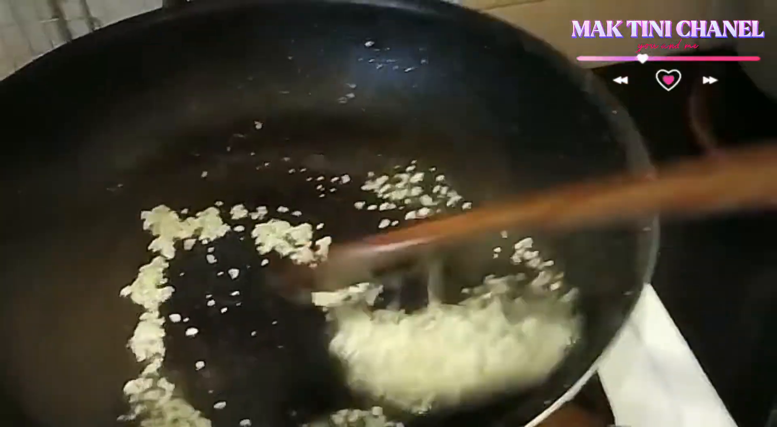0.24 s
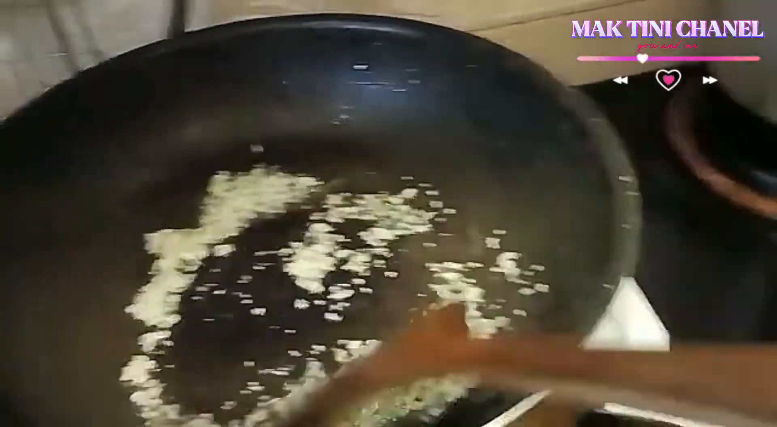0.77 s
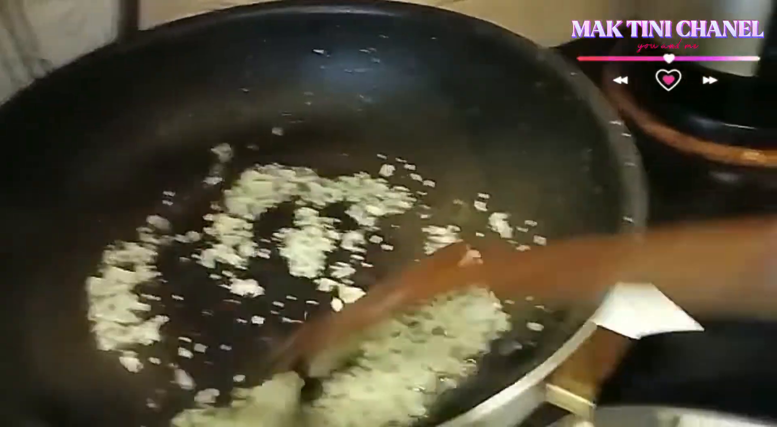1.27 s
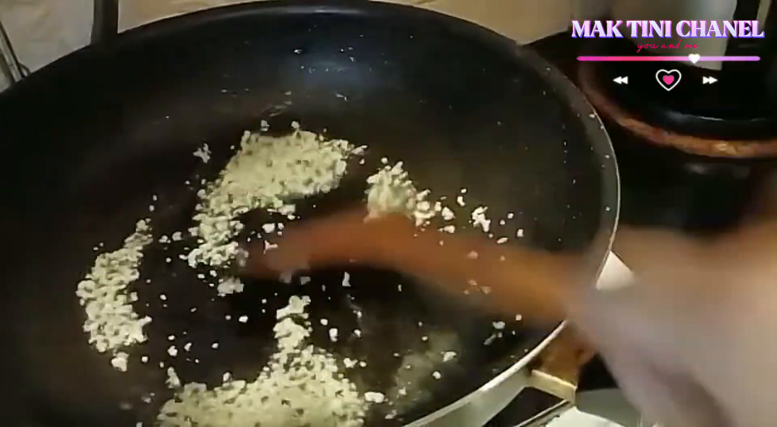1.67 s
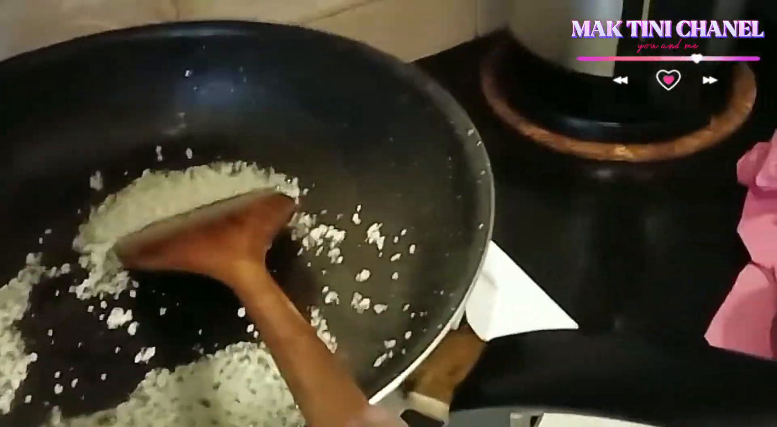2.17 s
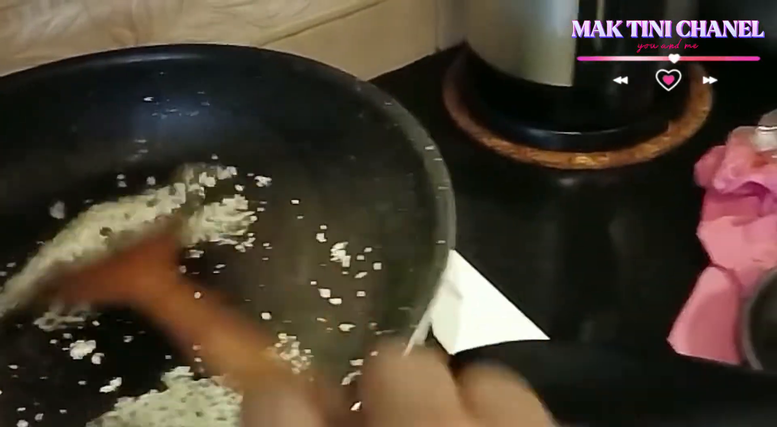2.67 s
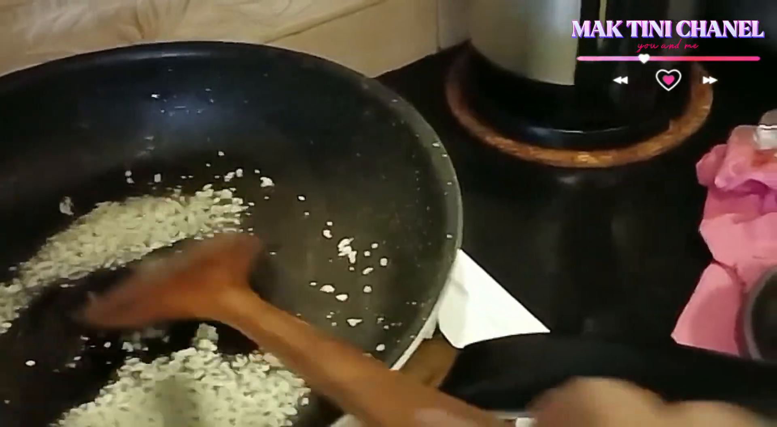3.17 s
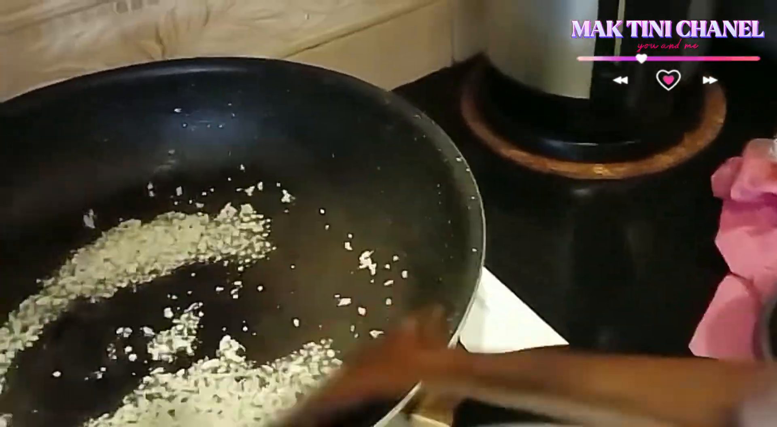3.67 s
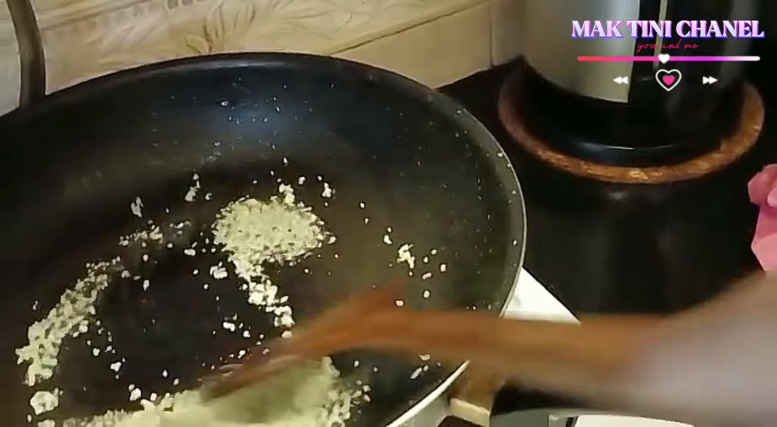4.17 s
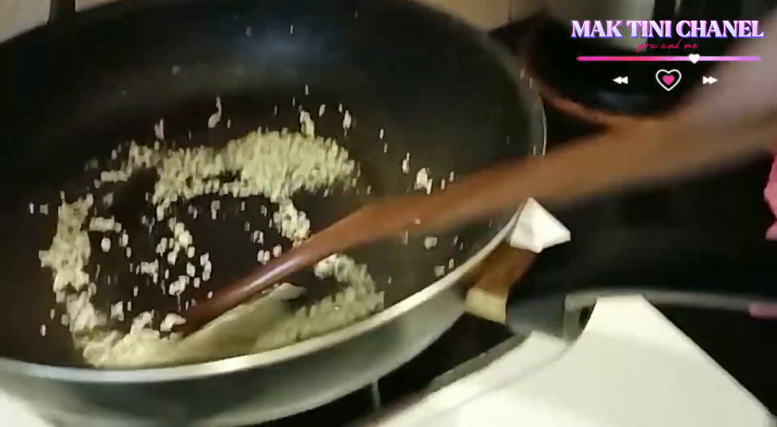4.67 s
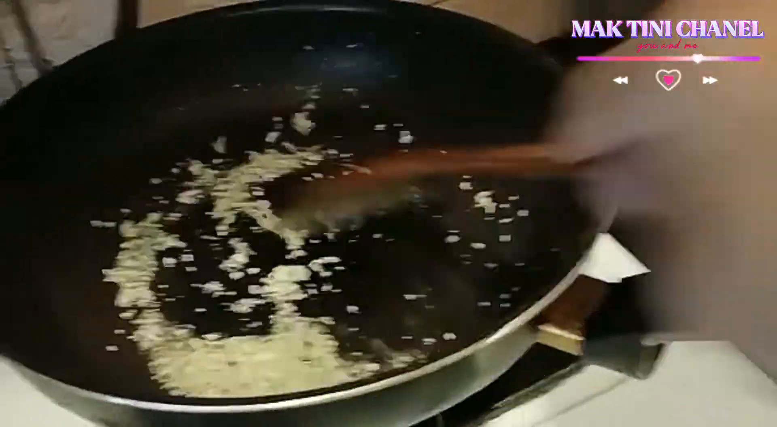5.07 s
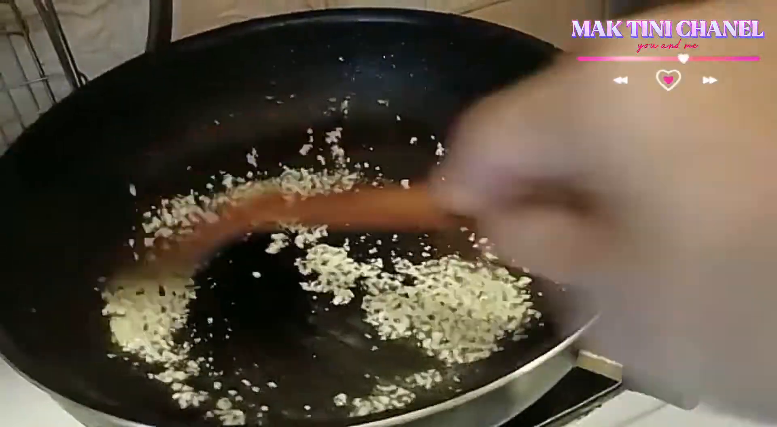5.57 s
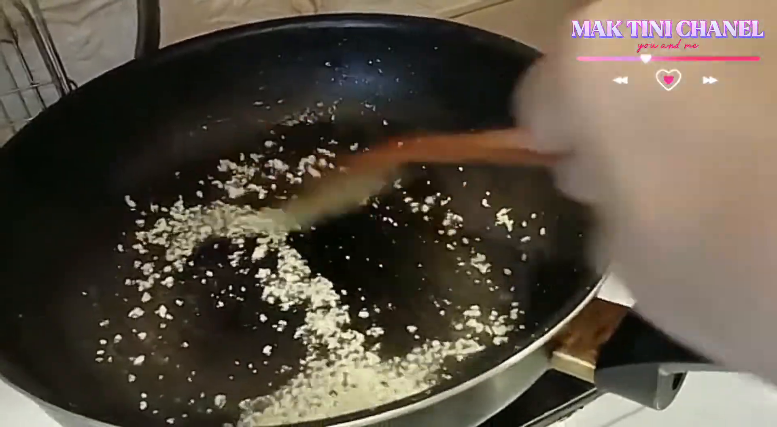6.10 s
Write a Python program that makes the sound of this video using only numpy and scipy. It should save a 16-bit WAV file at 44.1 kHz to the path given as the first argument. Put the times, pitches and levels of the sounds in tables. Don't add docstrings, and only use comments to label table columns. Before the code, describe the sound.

Close up in a small kitchen, a wooden spatula stirs garlic in a coated wok. It opens with a dull scuff and scrape, then sharp woody knocks with short metallic ring. Scrapes and quieter gaps alternate, with the hardest blows near the middle. Beneath runs a faint sizzle that gradually softens, plus a low, lumpy gas flame. Phone stereo microphone, slightly heavier on the left, with short room echo.

```python
import sys
import numpy as np
from scipy import signal
from scipy.fft import rfft, irfft, next_fast_len
from scipy.io import wavfile

SR = 44100
rng = np.random.default_rng(int(sys.argv[2]) if len(sys.argv) > 2 else 0)


def materialize(psi):
    bounded = np.clip(np.atleast_2d(psi).T, -1, 1)
    quanta = np.round(bounded * 32767).astype(np.int16)
    wavfile.write(sys.argv[1], SR, quanta)


def field_ratio(decibels):
    return 10 ** (np.asarray(decibels, dtype=float) / 20)


N = 279594
STEP = 32

# (time [s], level [dB])
FRY = [
    (0.0, -52),
    (0.44, -51),
    (1.48, -54),
    (1.84, -53),
    (2.47, -57),
    (3.0, -56),
    (3.36, -59),
    (5.03, -60),
    (5.67, -58),
    (6.34, -60),
]
# (time [s], level [dB])
ROAR = [
    (0.0, -52),
    (0.56, -53.5),
    (1.0, -53.5),
    (2.7, -52),
    (3.0, -53.5),
    (3.2, -53),
    (4.11, -52.5),
    (6.34, -51.5),
]
# (time [s], peak level [dB])
FLAPS = [(0.0, -45), (0.21, -48), (0.55, -50), (0.94, -53), (1.52, -51.5), (2.67, -54), (3.58, -56),
         (3.87, -56), (4.12, -53), (4.6, -55), (4.97, -45.5), (5.42, -54.5), (5.74, -52.5), (6.3, -55.5)]
FLAP_FADE_DB_PER_S, RUMBLE_REST_DB = 173, -64
# (frequency [Hz], level per Hz [dB])
SIZZLE = [(1180, -48), (2000, -4), (2320, 8.5), (2680, -41), (3090, -1), (4200, 1.5), (9070, 5.5),
          (11000, 5), (16000, -0.5)]
FLAME = [(76, -47), (130, -31), (174, -17.5), (226, -18.5), (360, 0.5), (537, -14.5), (738, -4),
         (1210, -10.5), (1570, -3.5), (2350, -25.5), (2890, -12), (3500, -23.5), (4550, -47), (7700, -120)]
RUMBLE = [(15, -67), (25, -37), (38, -58), (75, 24.5), (119, -27), (177, 2.5), (200, -32), (260, -49),
          (440, -120)]

# (time [s], peak level [dB], centre of colour [Hz], bowl hum [dB], rim [dB])
KNOCKS = [(0.471, -17, 1750, -49, -36), (0.712, -19.5, 1750, -47, -29.5), (1.223, -16.5, 1530, -36, -50),
          (1.479, -15.5, 1730, -48, -27.5), (2.627, -8.5, 1130, -39, -29), (2.633, -11, 1320, -65, -60),
          (3.341, -25.5, 1950, -53.5, -54), (3.785, -8.5, 1770, -38, -29.5),
          (3.849, -14.5, 1530, -38.5, -34), (4.605, -31, 1600, -45, -42), (4.882, -20, 1640, -45, -36),
          (4.887, -34, 1510, -44.5, -38), (4.897, -19.5, 1580, -63, -36)]
# (time [s], peak level [dB], centre of colour [Hz], bowl hum [dB], rim [dB])
SCUFFS = [(0.097, -13.5, 1180, -57, -73), (0.194, -23, 1600, -44.5, -48), (0.935, -22, 1150, -79, -61),
          (0.965, -17, 1000, -74, -48), (0.993, -19, 1060, -80, -64), (1.009, -30, 970, -75, -51),
          (1.167, -15, 1150, -46, -68), (1.532, -18, 1100, -46, -67), (1.549, -36, 1120, -54, -49),
          (1.733, -40, 1770, -55, -55), (2.098, -28, 1060, -48.5, -62), (2.802, -29, 1570, -63, -44),
          (3.121, -29, 1620, -70, -45), (4.111, -44, 2200, -62, -49.5), (5.129, -46, 1420, -46, -73),
          (5.621, -22, 1060, -64, -73), (5.672, -30, 1600, -50, -67)]
# (time [s], peak level [dB])
THUDS = [(0.095, -20.5), (0.712, -46), (1.167, -20), (1.224, -31), (1.735, -47), (2.628, -29.5),
         (3.785, -60), (4.067, -58), (4.605, -26.5), (5.625, -35), (5.678, -34)]
KNOCK_CONTACT_S, SCUFF_CONTACT_S, THUD_CONTACT_S = 0.0067, 0.013, 0.008
TOUCH_RISE_S, TOUCH_LEAD_S = 0.0016, 0.002287
# (frequency [Hz], level when struck [dB], time to fall 60 dB [s], level when scraped [dB])
BOWL = [(127.8, -6.5, 0.15, -31), (158.2, 1.5, 0.11, -8), (221.3, 4.5, 0.056, -11), (249.7, -2.5, 0.075, 2),
        (317.4, -5.5, 0.041, 0.5)]
LOWER = [(516.9, -7, 0.099, 2.5), (563.6, 6.5, 0.022, 3.5), (634, 13, 0.031, 4), (739, 1.5, 0.018, -1.5)]
WALL = [(901, -7, 0.073, 3), (960, -37, 0.02, -23), (1060, -5, 0.077, 5.5), (1150, 5, 0.021, -52),
        (1251, -1, 0.059, -0.5), (1380, -1.5, 0.03, -4.5), (1530, 1.5, 0.029, 1.5),
        (1600, -4.5, 0.073, 6.5), (1637, -1.5, 0.055, 3.5), (1970, -2, 0.039, 6), (2090, -17, 0.058, 0.5),
        (2226, 3.5, 0.046, -5)]
RIM = [(2450, 5.5, 0.026, 8), (2676, -0.5, 0.023, 2), (2890, -5, 0.027, -6), (3220, -2.5, 0.029, -4),
       (3443, 3, 0.024, 8), (3590, -9, 0.03, -11), (3840, -33, 0.016, -33), (4230, -6, 0.021, 5),
       (4652, -6.5, 0.022, -15), (4640, -8, 0.017, 2), (5203, -5, 0.0099, 1.5), (5720, -6, 0.036, 1),
       (6320, -6, 0.011, 1)]

# (time of hardest press [s], length [s], wall level [dB], centre of colour [Hz], rim level [dB])
WALL_DRAGS = [(0.11, 0.099, -34, 1180, -76), (0.194, 0.13, -37, 1380, -51), (0.46, 0.038, -40, 1900, -56),
              (0.701, 0.022, -40, 1900, -46), (0.997, 0.075, -28, 1060, -45),
              (1.16, 0.041, -32.5, 1200, -68), (1.295, 0.5, -63, 1530, -48),
              (1.31, 0.066, -38.5, 1220, -55), (1.545, 0.072, -35, 1150, -56),
              (1.728, 0.024, -35, 1770, -64), (1.968, 0.14, -43.5, 1460, -50),
              (2.086, 0.073, -46.5, 1330, -54), (2.826, 0.1, -35, 1710, -47),
              (2.896, 0.078, -41.5, 1050, -47), (2.943, 0.082, -44, 1060, -66),
              (3.021, 0.12, -39.5, 1430, -60), (3.125, 0.13, -40, 1480, -47.5),
              (3.273, 0.11, -40.5, 980, -57), (3.344, 0.055, -42, 1770, -47),
              (3.771, 0.029, -45, 1530, -47), (4.078, 0.053, -44, 1000, -72),
              (4.675, 0.11, -47.5, 1600, -48), (4.877, 0.014, -28, 1660, -34.5),
              (4.885, 0.031, -46, 1600, -37), (5.688, 0.21, -42.5, 1360, -54)]
# (time of hardest press [s], length [s], lower wall level [dB], bowl hum [dB])
BOTTOM_DRAGS = [(0.112, 0.068, -30, -43), (0.19, 0.18, -36, -36.5), (0.495, 0.09, -52, -41),
                (0.715, 0.067, -45, -41.5), (0.995, 0.15, -43.5, -83), (1.164, 0.11, -37.5, -45.5),
                (1.228, 0.17, -41.5, -45), (1.493, 0.056, -68, -46), (1.532, 0.05, -39.5, -52),
                (1.723, 0.069, -43.5, -48.5), (1.967, 0.2, -52, -68), (2.07, 0.17, -55.5, -50.5),
                (2.662, 0.22, -54, -47), (2.807, 0.038, -50, -52.5), (3.04, 0.2, -46, -49),
                (3.351, 0.027, -42, -67), (3.858, 0.031, -48, -49), (4.074, 0.083, -46, -47.5),
                (4.627, 0.074, -39, -41.5), (4.927, 0.14, -49.5, -56), (5.632, 0.07, -33, -42),
                (5.697, 0.11, -42, -58)]
PRESS_SHARE, PRESS_EDGE_DB, PRESS_SHAPE = 0.45, 23.5, 1.74
GLIDE_OCT_PER_S = -0.6
RUB_WANDER_DB = 3
SKID_WALL_DB, SKID_BOWL_DB, SKID_RIM_DB = -23.5, -4.5, -8
SKID_AFTER_S, SKID_FADE_DB_PER_S = 0.007, 597
CRACK_DB, CRACK_DECAY_S, RASP_DB = -10, 0.0098, -11.5
GRIT_LOW_HZ, GRIT_HIGH_HZ, GRIT_PER_S, GRIT_SPREAD_DB = 2000, 6500, 6000, 3.5
GRIT_LEFT_DB = 1.5

# (time [s], frequency [Hz], level [dB], time to fall 60 dB [s], left over right [dB])
NOTES = [(0.097, 1060, -32, 0.018, 21), (0.471, 1573, -18, 0.021, 5), (0.466, 1643, -26, 0.028, 6),
         (0.713, 1553, -23, 0.016, 15.5), (0.713, 2125, -20.5, 0.011, 7), (0.714, 1097, -30, 0.05, 7),
         (0.714, 3402, -34.5, 0.018, 17), (0.715, 5340, -43.5, 0.033, -3.0), (1.224, 1645, -30, 0.051, 9),
         (1.479, 1904, -14, 0.0091, 1), (1.479, 1102, -35.5, 0.088, 18), (1.479, 4500, -35, 0.06, 5),
         (1.479, 5500, -37, 0.037, -5), (2.627, 5690, -38, 0.022, 5), (1.555, 2710, -51.5, 0.036, 21.5),
         (2.627, 1275, -22.5, 0.02, 18.5), (2.628, 1590, -36, 0.05, 12), (2.632, 1060, -36, 0.046, 26),
         (2.627, 3110, -28, 0.017, 6), (2.628, 3930, -34.5, 0.018, -12.6), (3.341, 1865, -41, 0.034, 8),
         (3.785, 1856, -17.5, 0.027, 1), (3.786, 1262, -20.5, 0.029, 7), (3.787, 3480, -33, 0.02, 7),
         (3.787, 5430, -38.5, 0.027, 7), (3.786, 1096, -26.5, 0.042, 12), (3.8, 2100, -31, 0.03, 2.7),
         (3.822, 1870, -41, 0.024, 12.6), (3.849, 1486, -21, 0.02, 6), (3.849, 2010, -26.5, 0.028, -1),
         (3.85, 3540, -28.5, 0.017, 4.5), (4.604, 1608, -31, 0.044, 22), (0.475, 2130, -31.5, 0.032, 7),
         (4.882, 1560, -23, 0.045, -1), (4.888, 1547, -31, 0.037, -12.7), (4.895, 1800, -17.5, 0.022, 3),
         (4.888, 3680, -37.5, 0.055, 16), (4.895, 5300, -33, 0.017, 5.4), (4.905, 1513, -31, 0.025, 6.5)]
# (time [s], frequency [Hz], level [dB], time to fall 60 dB
# [s], left over right [dB])
MORE_NOTES = [
    (0.085, 700, -35, 0.067, 6),
    (1.513, 166, -31.5, 0.038, 2.5),
    (1.479, 1750, -15.5, 0.0085, 2.6),
    (2.627, 1080, -17.5, 0.016, 13.4),
    (0.24, 1400, -44, 0.022, 8.5),
    (3.792, 1900, -28, 0.018, 5),
    (2.803, 3400, -36.5, 0.047, 14),
]
NOTE_RISE_S, NOTE_DB = 0.0022, 2
# (time [s], peak level [dB])
HUMS = [
    (0.122, -39.5),
    (1.177, -35),
    (3.799, -40.5),
    (4.09, -47),
    (4.902, -35),
    (5.667, -37.5),
]
HUM_HZ, HUM_T60_S = 167.5, 0.4
# (time of middle [s], length [s], frequency [Hz], level [dB], left over right [dB])
SINGS = [(0.206, 0.082, 1610, -51, 17), (0.933, 0.027, 1300, -45, 20), (0.974, 0.039, 1034, -44, 30),
         (1.005, 0.051, 1020, -36, 28), (1.988, 0.045, 1610, -49, 8), (1.01, 0.08, 1606, -47, 8),
         (1.298, 0.082, 1568, -50, 22), (1.54, 0.052, 1095, -33, 23.5), (1.562, 0.038, 1635, -43.5, 6),
         (4.49, 0.045, 345, -49, 4), (1.731, 0.042, 1633, -45, 7), (2.828, 0.05, 3402, -45.5, 12),
         (2.895, 0.054, 3440, -59, 21.4), (2.83, 0.042, 2220, -43.8, 8), (2.85, 0.11, 2510, -55, 21),
         (2.93, 0.031, 2350, -54, 25), (2.83, 0.17, 1530, -55, 11.1), (2.837, 0.031, 890, -49.5, 27),
         (2.882, 0.09, 1068, -48, 16), (2.951, 0.076, 1064, -49, 23), (3.038, 0.07, 1096, -46, 8),
         (3.054, 0.072, 1628, -46.5, 15), (3.108, 0.061, 1080, -55, 30), (3.13, 0.04, 1608, -38, 15),
         (3.135, 0.032, 2560, -44.5, 14), (3.135, 0.043, 4720, -55, 13), (4.64, 0.03, 1600, -59, 15),
         (4.681, 0.064, 1637, -54, 25), (4.66, 0.046, 3330, -53, 3), (4.705, 0.056, 3330, -56.5, 4.5),
         (4.658, 0.037, 4500, -59.5, 20), (0.455, 0.03, 1650, -43, 7), (4.702, 0.039, 1057, -61, 34.5),
         (0.49, 0.022, 1638, -32, 3), (4.876, 0.021, 1790, -43, 14), (4.93, 0.081, 1513, -48, 6.8),
         (4.936, 0.13, 1048, -58, 23), (5.7, 0.074, 1623, -45, 12)]
# (time of middle [s], length [s], frequency [Hz], level [dB], left over right
# [dB])
MORE_SINGS = [
    (1.03, 0.063, 520, -44, 6.2),
    (0.29, 0.047, 250, -42, 4.4),
    (4.678, .08, 5350, -57, 5),
    (4.7, 0.05, 2120, -53, 6),
    (5.745, 0.046, 1080, -49.5, 8.2),
    (5.82, 0.056, 1930, -56.5, 9.8),
    (.93, 0.056, 1070, -43.5, 13),
    (4.078, 0.051, 646, -40, 5.5),
]
SING_DB, SING_WIDTH_HZ, SING_ROUGH, SING_RISE_SHARE = 0.5, 50, 1.1, 0.97
# (time [s], decay [s], centre frequency [Hz], level [dB])
GRINDS = [(0.713, .012, 2000, -34), (1.479, 0.017, 2390, -33), (3.338, 0.02, 2900, -48),
          (1.93, 0.037, 1600, -50), (1.98, 0.032, 1280, -41.5), (2.085, .025, 1400, -44),
          (2.628, 0.014, 2200, -32), (2.803, 0.075, 2500, -38), (2.995, 0.025, 2000, -43.5),
          (3.121, 0.023, 2200, -47), (3.786, 0.016, 2000, -30), (3.85, 0.018, 2200, -42),
          (4.066, 0.023, 900, -59), (4.606, 0.031, 600, -48), (4.875, 0.032, 4960, -43),
          (4.89, 0.038, 2200, -42), (5.618, 0.039, 795, -40.5), (5.68, 0.081, 3820, -52.5)]
GRIND_RISE_S, GRIND_OCTAVES, GRIND_LEFT_DB = 0.002, 0.5, 4.5
# (time [s], peak level [dB])
SPITS = [
    (1.235, -40),
    (2.6255, -65),
    (2.8, -38),
    (3.738, -34),
    (3.7894, -63),
    (3.8554, -58),
    (4.1206, -42.5),
    (4.6044, -46.5),
    (4.895, -54),
]

# (frequency [Hz], likeness [0 to 1])
LIKENESS = [(60, 0.9), (200, 0.052), (500, 0.039), (1500, 0.017), (4000, 0.0098)]
# (frequency [Hz], level [dB])
LEFT_OVER_RIGHT = [(60, 4.5), (250, 3.5), (600, 4.5), (1100, 7.5), (1700, 4), (2500, 2), (5000, 1.5),
                   (9000, -.3), (14000, -.8)]
LEFT_LAG_S = 0.00095
# (frequency [Hz], level [dB])
MICROPHONE = [(20, -6), (60, -12.5), (100, -2.5), (10500, 0.5), (12100, -7.5), (12400, -11), (13900, -14),
              (14400, -2.5), (15500, 1)]
TOP_HZ = 15820
KITCHEN_T60_S, KITCHEN_DB, WALL_CUT_HZ = 0.15, -14, 9000


def rms_one(x):
    return x / np.sqrt(np.mean(x ** 2) + 1e-20)


def in_time(rows):
    s, *columns = np.transpose(rows)
    t = np.arange(N // STEP + 2) * STEP / SR
    return [np.interp(t, s, column) for column in columns]


def since(s):
    return np.arange(N // STEP + 2) * STEP / SR - np.asarray(s)[:, None]


def per_sample(control):
    return np.interp(np.arange(N) / STEP, np.arange(len(control)), control)


def at_hz(points, hz):
    point_hz, value = np.transpose(points)
    return np.interp(np.log(hz), np.log(point_hz), value)


def db_sum(rows_db):
    return 10 * np.log10(np.sum(field_ratio(2 * rows_db), axis=0) + 1e-10)


def drift(rate):
    r = np.exp(-2 * np.pi * STEP * rate / SR)
    noise = rng.standard_normal(N // STEP + 2002)
    return rms_one(signal.lfilter([1], [1, -2 * r, r * r], noise)[2000:])


def later(x, s):
    return np.roll(x, max(round(s * SR), 0))


def grains(per_s, spread_db):
    sizes = field_ratio(spread_db * np.minimum(rng.exponential(1, N), 5)) * rng.choice([-1, 1], N)
    return rms_one(sizes * (rng.random(N) < per_s / SR))


def ring(force, hz, t60, rise_cycles):
    w = 2 * np.pi * hz / SR
    r = field_ratio(-60 / (t60 * SR))
    q = np.exp(-hz / (rise_cycles * SR))
    decay = [0, np.sin(w), 0, 1, -2 * r * np.cos(w), r * r]
    rise = [1 - q, 0, q - 1, 1, -2 * q * np.cos(w), q * q]
    return signal.sosfilt([decay, rise], force + 1e-18)


def lay(rows_s, waves, db, pan_db):
    out = np.zeros((2, N + waves.shape[1]))
    for s, wave, left, right in zip(rows_s, waves, field_ratio(db + pan_db / 2), field_ratio(db - pan_db / 2)):
        at = round(s * SR)
        out[:, at:at + len(wave)] += [left * wave.imag, right * wave.real]
    return out[:, :N]


def banded(source, spectrum, patchy_db, flicker_rate):
    out, together = 0, drift(0.97)
    edges = 2 ** np.arange(np.log2(spectrum[0][0]), np.log2(spectrum[-1][0]) + 1 / 3, 1 / 3)
    for k, (low, high) in enumerate(zip(edges, edges[1:])):
        band = signal.butter(2, [low, min(high, 0.45 * SR)], "band", fs=SR, output="sos")
        mid, side = signal.sosfilt(band, source[k % 2])
        hz = np.sqrt(low * high)
        alike = np.clip(at_hz(LIKENESS, hz), 0, 1)
        flicker_db = patchy_db * (0.03 * together + drift(flicker_rate))
        gain = per_sample(field_ratio(at_hz(spectrum, hz) + flicker_db))
        pair = np.sqrt(1 + alike) * mid + np.sqrt(1 - alike) * side * [[1], [-1]]
        out = out + gain * pair * field_ratio(at_hz(LEFT_OVER_RIGHT, hz) / 2 * np.array([[1], [-1]]))
    out[0] = later(out[0], LEFT_LAG_S)
    return rms_one(out)


def flaps_db():
    s, db = np.transpose(FLAPS)
    swell_db = db[:, None] - FLAP_FADE_DB_PER_S * np.abs(since(s))
    return np.maximum(db_sum(swell_db), RUMBLE_REST_DB)


def stove():
    (sizzle_db,), (flame_db,) = in_time(FRY), in_time(ROAR)
    bursts = np.reshape([grains(7000, spread_db=0.5) for _ in range(4)], (2, 2, N))
    air = rng.standard_normal((2, 2, N))
    sizzle = per_sample(field_ratio(sizzle_db + 7.0)) * banded(bursts, SIZZLE, patchy_db=1.25, flicker_rate=16.0)
    flame = per_sample(field_ratio(flame_db + 0.5)) * banded(air, FLAME, patchy_db=2.5, flicker_rate=12.4)
    rumble = per_sample(field_ratio(flaps_db() + 4.0)) * banded(air[::-1], RUMBLE, patchy_db=1.5, flicker_rate=41)
    return sizzle + flame + rumble


def press_db(s, length_s):
    t = since(s)
    side_s = length_s[:, None] * np.where(t < 0, PRESS_SHARE, 1 - PRESS_SHARE)
    return -PRESS_EDGE_DB * (np.abs(t) / side_s) ** PRESS_SHAPE


def stroke_controls():
    s, length_s, wall_db, hz, rim_db = np.transpose(WALL_DRAGS)
    at, peak_db, knock_hz, knock_bowl_db, knock_rim_db = np.transpose(KNOCKS)
    low_s, low_length_s, lower_db, bowl_db = np.transpose(BOTTOM_DRAGS)
    after = since(at + SKID_AFTER_S)
    skid = np.where(after < 0, -99, -SKID_FADE_DB_PER_S * after)
    press = np.vstack([press_db(s, length_s), skid])
    low = press_db(low_s, low_length_s)
    wall = press + np.r_[wall_db, peak_db + SKID_WALL_DB][:, None]
    rim = press + np.r_[rim_db, knock_rim_db + SKID_RIM_DB][:, None]
    bowl = np.vstack([low + bowl_db[:, None], skid + (knock_bowl_db + SKID_BOWL_DB)[:, None]])
    glide = np.clip(GLIDE_OCT_PER_S * np.vstack([since(s), after]), -0.5, 0.5)
    centre = np.r_[hz, knock_hz][:, None] * 2 ** glide
    weight = field_ratio(2 * wall) + 1e-30
    centre_hz = np.sum(weight * centre, axis=0) / np.sum(weight, axis=0)
    return db_sum(wall), centre_hz, db_sum(low + lower_db[:, None]), db_sum(bowl), db_sum(rim)


def chatter_of(contact_s):
    t = np.arange(2048) / SR
    draws = rng.random((len(contact_s), 2, len(t)))
    touches = (draws[:, 0] - 0.5) * (draws[:, 1] < 0.15) + 1e-6
    fade = np.exp(-t / np.maximum(contact_s / 2, 2e-4)[:, None])
    shake = touches * (1 - np.exp(-t / TOUCH_RISE_S)) * fade
    return shake / np.sqrt(np.sum(shake ** 2, axis=1, keepdims=True))


def colour_db(hz, centre_hz, below_db, above_db):
    octaves = np.log2(hz / centre_hz)
    return -np.where(octaves < 0, below_db, above_db) * octaves ** 2


def knock_force(blows, strength_db, chatter, hz):
    length = chatter.shape[1]
    force = np.zeros(N + length)
    share = np.abs(chatter @ np.exp(-2j * np.pi * hz * np.arange(length) / SR))
    for blow, gain, shake in zip(blows, field_ratio(strength_db) / np.maximum(share, 0.4), chatter):
        at = round((blow[0] - TOUCH_LEAD_S) * SR)
        force[at:at + length] += gain * shake
    return force[:N]


def wok(strokes):
    blade_blows = KNOCKS + SCUFFS
    s, peak_db, centre_hz, hum_db, rim_db = np.transpose(blade_blows)
    contact_s = np.repeat([KNOCK_CONTACT_S, SCUFF_CONTACT_S], [len(KNOCKS), len(SCUFFS)])
    thud_contact_s = np.full(len(THUDS), THUD_CONTACT_S)
    drag_db, drag_hz, drag_lower_db, drag_hum_db, drag_rim_db = strokes
    sharp, dull = chatter_of(contact_s), chatter_of(thud_contact_s)
    sharp_right, dull_right = chatter_of(contact_s), chatter_of(thud_contact_s)
    slips = np.array([grains(5000, spread_db=3.5) for side in range(2)])
    slips[1] = 0.43 * slips[0] + 0.83 * slips[1]
    slips *= per_sample(field_ratio(2.0 * drift(27.0)))
    out = np.zeros((2, N))
    for modes in (BOWL, LOWER, WALL, RIM):
        blows, chatter = blade_blows, [sharp, sharp_right]
        shared_luck_db, rise_cycles, lag_s, path_spread_s = 1.3, 3.5, 0, 0.00017
        if modes is BOWL:
            chatter = [sharp, sharp]
            rise_cycles, lag_s, path_spread_s = 1.4, 0.0052, 0
        elif modes is LOWER:
            blows, chatter = THUDS, [dull, dull + 0.57 * dull_right]
        elif modes is RIM:
            shared_luck_db = 3.5
        for hz, struck_db, t60, scraped_db in modes:
            if modes is BOWL:
                blow_db, rub_db = hum_db + 3.5, drag_hum_db - 4.0
            elif modes is LOWER:
                blow_db, rub_db = np.array(THUDS)[:, 1] - 4, drag_lower_db - 8.0
            elif modes is WALL:
                blow_db = peak_db + colour_db(hz, centre_hz, below_db=13.0, above_db=44) - 11.5
                rub_db = drag_db + colour_db(hz, drag_hz, below_db=17.0, above_db=25.0) - 11
            else:
                blow_db, rub_db = rim_db - 5.5, drag_rim_db - 17
            strength_db = blow_db + struck_db + shared_luck_db * rng.normal(0, 1, len(blows))
            force = [knock_force(blows, strength_db + 3.47 * rng.normal(0, 1, len(blows)), heard, hz)
                     for heard in chatter]
            rub = per_sample(field_ratio(rub_db + scraped_db + RUB_WANDER_DB * drift(11.7)))
            rub *= np.sqrt(4 * np.log(1000) / (t60 * SR))
            rubbing = rub * np.roll(slips, round(7 * hz), axis=1)
            left, right = ring(force + rubbing, hz, t60, rise_cycles)
            path_s = rng.normal(0, 1) * path_spread_s
            tilt_db = at_hz(LEFT_OVER_RIGHT, hz) / 2
            out[0] += field_ratio(tilt_db) * later(left, lag_s + LEFT_LAG_S + path_s)
            out[1] += field_ratio(-tilt_db) * later(right, lag_s)
    return out


def grit(drag_rim_db):
    s, *_, rim_db = np.transpose(KNOCKS)
    after = since(s)
    fade_db = 20 / np.log(10) * after / CRACK_DECAY_S
    crack_db = np.where(after < 0, -99, rim_db[:, None] + CRACK_DB - fade_db)
    rasp_db = drag_rim_db + RASP_DB + 4.3 * drift(25)
    level = field_ratio(db_sum(np.vstack([crack_db, rasp_db])))
    common, left, right = (grains(GRIT_PER_S, GRIT_SPREAD_DB) for _ in range(3))
    dust_left = field_ratio(GRIT_LEFT_DB) * later(common + 0.61 * left, LEFT_LAG_S)
    dust = np.array([dust_left, common + 0.84 * right]) * per_sample(level)
    band = signal.butter(2, [GRIT_LOW_HZ, GRIT_HIGH_HZ], "band", fs=SR, output="sos")
    return signal.sosfilt(band, dust)


def notes(rows):
    s, hz, db, t60, pan_db = np.transpose(rows)
    t = np.arange(4096) / SR
    shape = (1 - np.exp(-t / NOTE_RISE_S)) ** 2 * field_ratio(-60 * t / np.maximum(t60, 0.004)[:, None])
    shape /= shape.max(axis=1, keepdims=True)
    turns = hz[:, None] * t + rng.random((len(s), 1))
    return lay(s, shape * np.exp(2j * np.pi * turns), db + NOTE_DB, pan_db)


def hum():
    push = np.zeros(N)
    for s, db in HUMS:
        push[round(s * SR)] = field_ratio(db + 1.0)
    note = ring(push, HUM_HZ, HUM_T60_S, rise_cycles=1.7)
    return np.array([field_ratio(3.5) * later(note, LEFT_LAG_S), field_ratio(3.0) * note])


def sings(drags):
    s, length_s, hz, db, pan_db = np.transpose(drags)
    t = (np.arange(8192) - 4096) / SR
    r = np.exp(-2 * np.pi * SING_WIDTH_HZ / SR)
    draws = rng.standard_normal((len(s), 2, len(t)))
    shake = signal.lfilter([1], [1, -2 * r, r * r], draws[:, 0] + 1j * draws[:, 1])
    shake = 1 + SING_ROUGH * shake / np.sqrt(np.mean(np.abs(shake) ** 2))
    span_s = 0.94 * length_s[:, None] * np.where(t < 0, SING_RISE_SHARE, 1.2)
    press = np.cos(np.pi * np.clip(t / span_s, -0.5, 0.5))
    tone = np.exp(2j * np.pi * hz[:, None] * t)
    return lay(s + t[0], press * shake * tone, db + SING_DB, pan_db)


def grinds():
    s, decay_s, hz, db = np.transpose(GRINDS)
    t = np.arange(8192) / SR
    draws = rng.random((len(s), 4, len(t)))
    dust = (draws[:, :2] - 0.5) * (draws[:, 2:] < 0.12)
    octaves = np.log2(np.maximum(np.arange(4097) * SR / 8192, 1) / hz[:, None, None])
    dust = irfft(rfft(dust) * np.exp(-0.5 * (octaves / GRIND_OCTAVES) ** 2), len(t))
    dust = dust / dust.std(axis=2, keepdims=True)
    shape = (1 - np.exp(-t / GRIND_RISE_S)) * np.exp(-t / decay_s[:, None])
    left, right = dust[:, 0], 0.27 * dust[:, 0] + 0.88 * dust[:, 1]
    return lay(s, shape * (1j * left + right), db, np.full(len(s), GRIND_LEFT_DB))


def spits():
    out, t = np.zeros((2, N + 1024)), np.arange(1024) / SR
    shape = (1 - np.exp(-t / 0.002)) * np.exp(-t / 0.012)
    for s, peak_db in SPITS:
        at = round(s * SR)
        out[:, at:at + 1024] += field_ratio(peak_db + 3.5) * rng.standard_normal((2, 1024)) * shape
    return signal.sosfilt(signal.butter(2, 1500, "high", fs=SR, output="sos"), out[:, :N])


def kitchen(x):
    out, dull = np.zeros((2, N)), np.exp(-2 * np.pi * WALL_CUT_HZ / SR)
    for k, lag in enumerate((rng.uniform(0.014, 0.031, 8) * SR).astype(int)):
        source = x[k % 2]
        loop, gain, state = source.copy(), field_ratio(-60 * lag / SR / KITCHEN_T60_S), [0.]
        for i in range(lag, N, lag):
            back, state = signal.lfilter([gain * (1 - dull)], [1, -dull], loop[i - lag:i], zi=state)
            loop[i:i + lag] += back[:N - i]
        out[k % 2] += (loop - source) * (-1) ** (k // 2)
    return out


def scene():
    strokes = stroke_controls()
    near = wok(strokes) + grit(strokes[4])
    near += notes(NOTES) + notes(MORE_NOTES) + hum()
    near += sings(SINGS) + sings(MORE_SINGS) + grinds() + spits()
    return near + field_ratio(KITCHEN_DB) * kitchen(near) + stove()


def top_cut(x):
    return signal.sosfilt(signal.butter(12, 15900, fs=SR, output="sos"), x)


def record(dry):
    size = next_fast_len(N + 4096)
    hz = np.maximum(np.arange(size // 2 + 1) * SR / size, 1)
    rounded = 0.73 * np.tanh(dry / 0.77)
    response = field_ratio(at_hz(MICROPHONE, hz)) * (hz < TOP_HZ)
    mix = irfft(rfft(rounded, size) * response, size)[:, :N]
    return top_cut(mix)


dry = scene()
out = record(dry)
materialize(out)
```